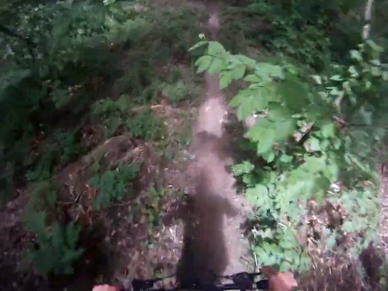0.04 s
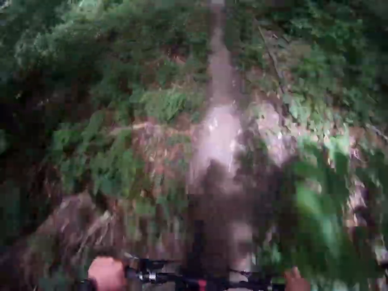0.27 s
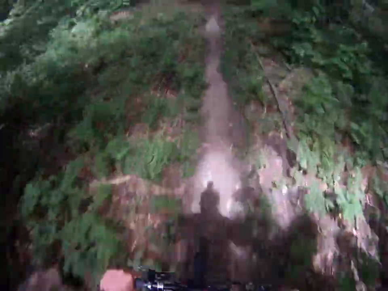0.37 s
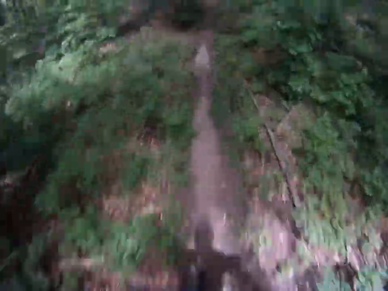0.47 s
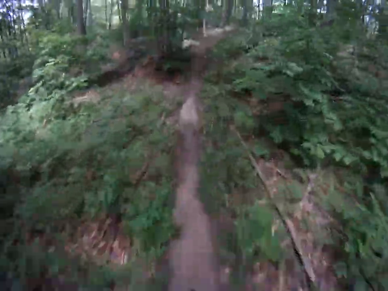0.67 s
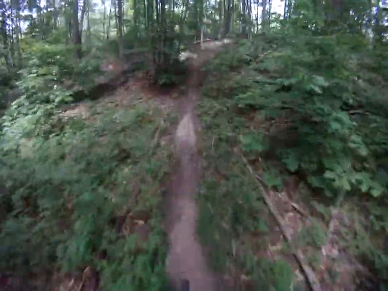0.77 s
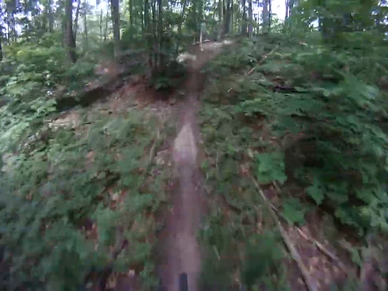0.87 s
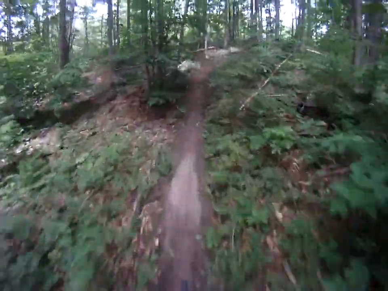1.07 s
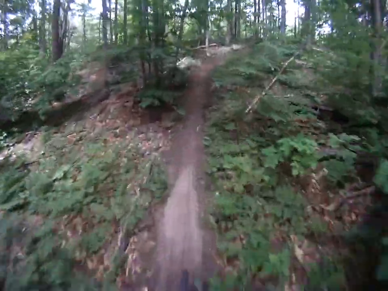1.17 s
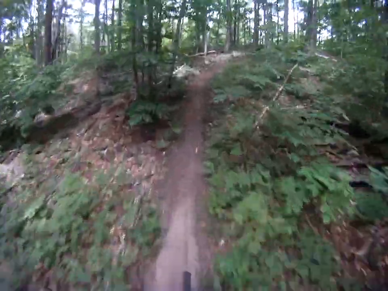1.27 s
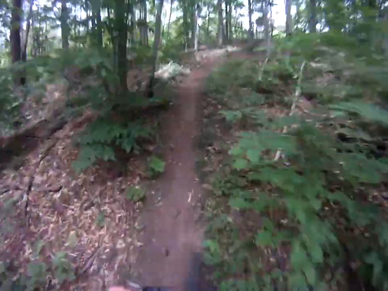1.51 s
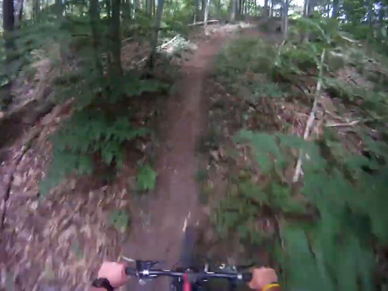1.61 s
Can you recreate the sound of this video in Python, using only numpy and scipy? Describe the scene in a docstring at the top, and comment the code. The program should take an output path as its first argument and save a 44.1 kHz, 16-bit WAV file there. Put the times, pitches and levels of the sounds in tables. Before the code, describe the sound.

Heard from a mountain bike rider on a wooded trail, leaves smack and briefly scrape right over the microphone. Afterwards come quiet tyre noise on dirt, small bursts of plastic chatter and faint rumbling wind.

```python
"""Tyres hiss and crunch softly on a dirt trail, heard from a camera in a plastic case on a mountain
bike rider. A moment in, right at the microphone, a leafy branch slaps the case, drags across it
and flicks off. Bumps set the camera mount chattering. From below, grit ticks on the bike and the
knobbly tyre drones in spurts, while wind rumbles on the case."""
import sys
import numpy as np
from scipy import signal
from scipy.fft import rfft, irfft, next_fast_len
from scipy.io import wavfile
from scipy.ndimage import map_coordinates

SR = 44100
rng = np.random.default_rng(int(sys.argv[2]) if len(sys.argv) > 2 else 0)


def inscribe(sig):
    """Save sig as 16-bit PCM at rate SR to the path in sys.argv[1].

    A 1-D sig is mono; a 2-D sig holds one channel per row.
    Samples are clipped to [-1, 1] before scaling.
    """
    pcm = np.round(np.clip(np.atleast_2d(sig).T, -1, 1) * 32767)
    wavfile.write(sys.argv[1], SR, pcm.astype(np.int16))


N = 72765

# leaves striking the case, right at the microphone (time [s], level [dB], t60 [s], brightness [dB])
LEAF_SLAPS = [(0.2207, -5.5, 0.034, -5.5), (0.2225, -2.5, 0.022, 0.5), (0.2279, -7, 0.026, -16.5),
              (0.2338, -10.5, 0.0132, -19.5), (0.2401, -3.5, 0.023, 6.5), (0.2461, -9, 0.03, 2),
              (0.2496, -15, 0.02, 14)]
# the case as the leaves strike it (frequency [Hz], level [dB])
SLAP_COLOUR = [(120, -17.5), (320, -13.5), (486, -22.5), (624, -18.5), (914, -15.5), (1040, -1),
               (1360, -11), (1460, -4), (1610, -9.5), (2000, -3.5), (2170, -10.5), (2400, -2), (2790, -13),
               (3290, -7), (3700, -1), (4150, -16.5), (4820, -13), (5990, -28), (8490, -11.5),
               (10400, -21.5), (11300, -35), (11800, -53), (12700, -29), (14500, -20.5), (16000, -38)]
# the treble that a slap's brightness lifts or cuts (frequency [Hz], share of the brightness [0-1])
BRIGHT_BAND = [(2400, 0.34), (3400, 0.84), (8500, 0.66), (10500, 0.14)]
# leaves sliding over the case (time [s], level [dB])
DRAG_LEVEL = [(.246, -60), (.251, -25), (.263, -20.5), (.266, -18.5), (.279, -20.5), (.288, -23.5),
              (.298, -32.5), (.322, -32), (.335, -62.5)]
# the case under the sliding leaves (frequency [Hz], level [dB])
DRAG_COLOUR = [(500, -42), (855, -20), (1030, -5.5), (1320, -18.5), (1820, -10.5), (2260, -5), (2850, -18),
               (3240, -17), (3640, -11.5), (4400, -29), (5540, -29), (6050, -35), (7740, -32.5),
               (8320, -17), (9070, -30), (9900, -14), (11300, -42.5), (12100, -82.5), (12700, -43),
               (14400, -18), (16000, -53.5)]
# a dragged leaf catching (start [s], length [s], level [dB])
LEAF_RASPS = [(0.2647, 0.0028, -16), (0.2745, 0.0078, -16.5)]
# hard knocks of the case (time [s], level [dB], t60 [s])
CASE_KNOCKS = [(0.3352, -10.5, 0.018), (0.338, -18, 0.0185), (1.5537, -16.5, 0.013)]
# the knocked case (frequency [Hz], level [dB])
KNOCK_COLOUR = [(300, -29.5), (574, -31), (1010, -0.5), (2250, 3), (2650, -10), (3760, -17.5),
                (4360, -36.5), (5150, -28.5), (5990, -43.5), (6840, -27.5), (7680, -46), (8210, -23),
                (9070, -25), (9860, -10.5), (10400, -9.5), (12200, -56), (13500, -14), (14200, -13.5),
                (16000, -48)]
# soft, heavy pushes on the camera (time [s], level [dB], t60 [s], ring pitch [Hz])
CAMERA_THUMPS = [(0.221, -14.5, 0.05, 142.2), (1.635, -31.5, 0.035, 254)]
# modes of the pushed camera (multiple of the ring pitch [ratio], relative level [dB])
THUMP_MODES = [(1, 1), (1.55, -5.5), (2.4, -7)]
# a faint, brief ping of the case (time [s], level [dB], t60 [s], pitch [Hz])
CASE_PING = (0.6, -38.5, 0.1, 1499)
# bumps shaking the mount, and at 0.283 and 0.322 s the dull tail of the leaves dragging across the case (start
# [s], length [s], level [dB])
MOUNT_CHATTERS = [(0.015, 0.015, -45.5), (0.161, 0.0058, -44.5), (0.283, 0.0304, -32),
                  (0.322, 0.0035, -25.5), (0.418, 0.022, -46), (0.468, 0.0175, -45.5),
                  (0.508, 0.013, -36.5), (0.538, 0.027, -35.5), (0.644, 0.029, -45), (0.712, 0.0302, -34),
                  (0.748, 0.0059, -36.5), (0.979, 0.0393, -45), (1.113, 0.019, -39), (1.236, 0.031, -37),
                  (1.286, 0.017, -37.5), (1.451, 0.013, -38.5), (1.604, 0.0068, -42.5),
                  (1.614, 0.0265, -38.5)]
# the case on its chattering mount (frequency [Hz], level [dB])
CHATTER_COLOUR = [(88, -40), (170, -11), (270, -0.5), (380, -19), (513, -22), (774, -15), (978, 4),
                  (1120, 0), (1310, 5), (1530, -17.5), (1790, -6.5), (1980, 0.5), (2270, -5.5),
                  (2700, -4.5), (3160, -26.5), (3550, -13), (4490, -42.5), (6010, -43.5), (7460, -40),
                  (9610, -16), (11000, -18.5), (12100, -74), (12900, -19), (14500, -20), (16000, -43)]
# tyres rolling on the dirt below the rider (time [s], level [dB])
ROLL_LEVEL = [(0, -57), (.1, -52), (.36, -50), (.45, -51), (.6, -54), (.68, -51), (.82, -48), (.95, -50),
              (1.08, -49), (1.2, -47), (1.42, -49), (1.55, -44.5), (1.59, -50.5), (1.65, -43.5)]
# the tyres as heard inside the case (frequency [Hz], level [dB])
ROLL_COLOUR = [(100, -23), (235, -9.5), (409, -17.5), (623, -15), (776, -18), (950, -6), (1230, -2.5),
               (1560, -9.5), (1840, -11), (1980, -4), (2330, -5.5), (3180, -26), (3750, -23), (4270, -42),
               (4760, -26.5), (5220, -35.5), (7670, -35.5), (8880, -30), (9920, -18), (11100, -26),
               (11900, -41.5), (12800, -25.5), (14600, -22), (16000, -62)]
# spurts of low tread hum (start [s], level [dB], length [s])
TREAD_DRONES = [(0.043, -44.5, 0.014), (0.23, -30.5, 0.042), (0.32, -32.5, 0.06), (0.473, -33.5, 0.037),
                (0.732, -44.5, 0.025), (0.824, -40.5, 0.03), (0.905, -42.5, 0.023), (1.302, -39.5, 0.04),
                (1.399, -36.5, 0.021), (1.446, -39.5, 0.026), (1.499, -34.5, 0.038)]
# low plants brushing the bike (start [s], length [s], level [dB])
PLANT_BRUSHES = [(0.178, 0.04, -59), (0.842, 0.011, -58), (1.367, 0.062, -60.5), (1.439, 0.057, -58.5)]
# bits of gravel and twig hitting the bike (time [s], level [dB])
GRAVEL_TICKS = [(.127, -50), (.203, -47), (.383, -46), (.6956, -55), (.834, -49.5), (0.8468, -45.5),
                (.879, -48.5), (0.916, -51.5), (1.05, -60), (1.388, -47)]
# grit, plants and ticks at the microphone (frequency [Hz], level [dB])
GRIT_COLOUR = [(1500, 4.5), (3800, 7), (6000, -6.5), (8500, 2.5), (11500, -23)]
# wind on the case (time [s], level [dB])
WIND_LEVEL = [(0, -49.5), (.15, -45.5), (.3, -36), (.6, -49.5), (.85, -38.5), (1.05, -48), (1.2, -41),
              (1.65, -38.5)]
# the wind's rumble (frequency [Hz], level [dB])
WIND_COLOUR = [(8, -18.5), (22, 1), (45, -5), (85, -6.5), (130, -24.5), (300, -35), (800, -73)]
# bands the case cancels at the microphone (frequency [Hz], width [Hz])
CASE_NOTCHES = [(6050, 280), (12100, 700)]


def branch():
    """At the microphone, leaves slap the case one after another, then stick and slip across it."""
    slaps = np.zeros(N)
    for start, db, t60, bright_db in LEAF_SLAPS:
        force = amp(db) * blow(start, t60, attack_s=0.00012)
        slaps += ring(force * contacts(per_s=5000, scatter=0.5, spread_db=1), SLAP_COLOUR, bright_db)
    stick_slip = level(DRAG_LEVEL) * contacts(per_s=1800, scatter=0.45, spread_db=5)
    return slaps + ring(stick_slip, DRAG_COLOUR)


def leaf_rasp():
    """A dragged leaf grips the case and judders at a wavering pitch."""
    grip = sum(amp(db) * spurt(start, length, attack_s=0.0019, release_s=0.0053)
               for start, length, db in LEAF_RASPS)
    return grip * wavering_tone(hz=2192, waver=0.068, knots_per_s=900)


def case_knocks():
    """The case knocks against its mount, hard and close."""
    force = sum(amp(db) * blow(start, t60, attack_s=0.00059) for start, db, t60 in CASE_KNOCKS)
    return ring(force * contacts(per_s=5200, scatter=0.25, spread_db=4.5), KNOCK_COLOUR)


def camera_thumps():
    """Each push on the camera is answered by a short low ring."""
    thumps = np.zeros(N)
    for start, db, t60, hz in CAMERA_THUMPS:
        decay = blow(start, t60, attack_s=0.00064)
        for ratio, mode_db in THUMP_MODES:
            thumps += amp(db + mode_db) * decay * np.sin(2 * np.pi * hz * ratio * (clock() - start))
    return thumps


def case_ping():
    """One mode of the case gives a faint, brief ping near 1.5 kHz."""
    start, db, t60, hz = CASE_PING
    return amp(db) * blow(start, t60, attack_s=0.001) * np.sin(2 * np.pi * hz * (clock() - start))


def mount_chatter():
    """On bumps, and as the dragged leaves trail off the case, bursts of fast, uneven contacts ring the plastic
    around the microphone."""
    force = sum(amp(db) * spurt(start, length, attack_s=0.0019, release_s=0.0053)
                for start, length, db in MOUNT_CHATTERS)
    return ring(force * contacts(per_s=1600, scatter=0.6, spread_db=-0.5), CHATTER_COLOUR)


def tyre_crunch():
    """Below the microphone, dirt crunches densely under the rolling tyres."""
    flicker_db = 1.86 * wobble(knots_per_s=35)
    load = level(ROLL_LEVEL) * amp(flicker_db)
    return ring(load * contacts(per_s=4000, scatter=0.8, spread_db=3), ROLL_COLOUR)


def trail_rustle():
    """Grit and low plants crackle faintly against the bike, with a few distinct ticks of gravel."""
    plants = sum(amp(db) * spurt(start, length, attack_s=0.0099, release_s=0.025)
                 for start, length, db in PLANT_BRUSHES)
    grit = amp(-26) * level(ROLL_LEVEL)
    crackle = contacts(per_s=900, scatter=0.9, spread_db=5)
    hits = sum(amp(db) * blow(start, t60=0.018, attack_s=0.0002) for start, db in GRAVEL_TICKS)
    ticks = hits * rng.standard_normal(N)
    return ring((plants + grit) * crackle + ticks, GRIT_COLOUR)


def tread_drone():
    """Down at the trail, the tread hums unsteadily whenever the tyre is pressed down."""
    force = sum(amp(db) * spurt(start, length, attack_s=0.012, release_s=0.069)
                for start, db, length in TREAD_DRONES)
    return force * wavering_tone(hz=69.5, waver=0.08, knots_per_s=29)


def wind():
    """Air buffets the case, a low rumble behind everything else."""
    return level(WIND_LEVEL) * unit(ring(rng.standard_normal(N), WIND_COLOUR))


def amp(db):
    """Decibels to gain."""
    return 10 ** (np.asarray(db) / 20)


def unit(x):
    """Scaled to rms 1."""
    return x / np.sqrt(np.mean(x ** 2) + 1e-20)


def clock():
    """The time of every sample in seconds."""
    return np.arange(N) / SR


def along(points, hz):
    """(frequency [Hz], value) points joined on a log frequency axis."""
    point_hz, values = np.transpose(points)
    return np.interp(np.log(hz + 1), np.log(point_hz + 1), values)


def level(rows):
    """Gain per sample from (time [s], level [dB]) rows."""
    return amp(np.interp(clock(), *np.transpose(rows)))


def wobble(knots_per_s):
    """A smooth curve through evenly spaced random knots."""
    return map_coordinates(rng.standard_normal(N // 8), [clock() * knots_per_s], mode="wrap")


def wavering_tone(hz, waver, knots_per_s):
    """A sine of rms 1 whose pitch wanders by about the fraction waver."""
    pitch = hz * (1 + waver * wobble(knots_per_s))
    return unit(np.sin(2 * np.pi * np.cumsum(pitch) / SR))


def ring(force, colour, bright_db=0):
    """A force through a resonant body of unit power gain with the given spectrum."""
    size = 2 * next_fast_len(N)
    hz = np.fft.rfftfreq(size, 1 / SR)
    gain = unit(amp(along(colour, hz) + bright_db * along(BRIGHT_BAND, hz)))
    # minimum phase: the body rings only after it is struck
    cepstrum = irfft(np.log(gain + 1e-6), size)
    cepstrum[1:size // 2] *= 2
    cepstrum[size // 2 + 1:] = 0
    response = np.exp(rfft(cepstrum))
    return irfft(rfft(force, size) * response, size)[:N]


def contacts(per_s, scatter, spread_db):
    """Tiny impacts of uneven strength at log-normal intervals, rms 1."""
    gap, strength, sign = rng.standard_normal((N // 4, 3)).T
    intervals = np.exp(scatter * gap)
    at = (np.cumsum(intervals / intervals.mean()) * SR / per_s).astype(int)
    force = np.sign(sign) * amp(spread_db * np.clip(strength, -2, 2))
    return unit(np.bincount(at[at < N], force[at < N], N))


def blow(start, t60, attack_s):
    """A quick rise and an exponential fall of 60 dB in t60 seconds."""
    age = np.maximum(clock() - start, 0)
    return (1 - np.exp(-age / attack_s)) * np.exp(-np.log(1000) * age / t60)


def spurt(start, length, attack_s, release_s):
    """Attack, hold and release."""
    age = clock() - start
    return np.clip(age / attack_s, 0, 1) * np.clip(1 - (age - length) / release_s, 0, 1) ** 2


def scene():
    """One microphone on the rider: the case up close, the trail below, the wind behind it all."""
    close = branch() + leaf_rasp() + case_knocks() + camera_thumps() + case_ping() + mount_chatter()
    trail = tyre_crunch() + trail_rustle() + tread_drone()
    return (close + trail + wind())[None]


def record(dry):
    """The case cuts two notches; the camera clips at full scale and loses the highest treble."""
    for hz, width_hz in CASE_NOTCHES:
        dry = signal.lfilter(*signal.iirnotch(hz, hz / width_hz, fs=SR), dry)
    clipped = np.clip(dry, -1, 1)
    low_pass = signal.firwin(129, cutoff=16100, fs=SR)
    return signal.fftconvolve(clipped, low_pass[None], mode="same", axes=1)


dry = scene()
out = record(dry)
inscribe(out)
```